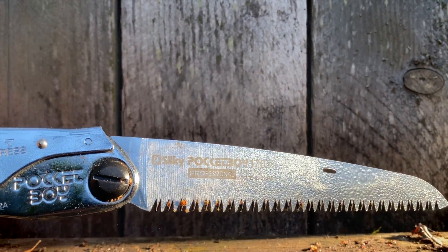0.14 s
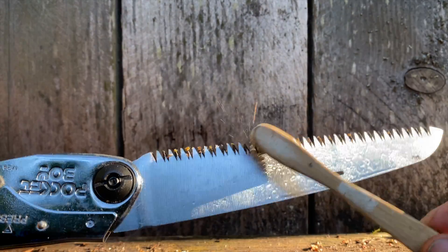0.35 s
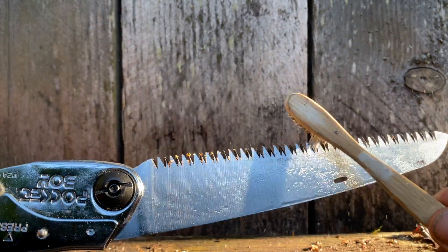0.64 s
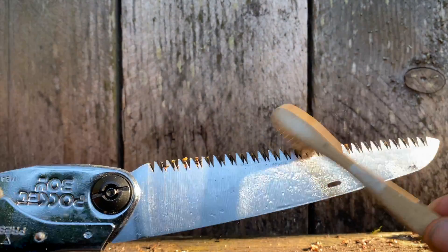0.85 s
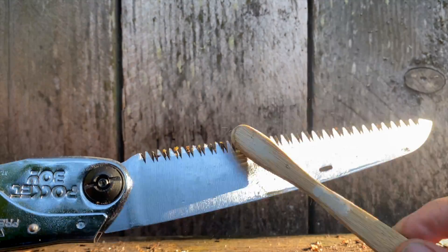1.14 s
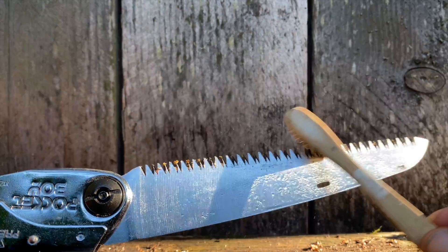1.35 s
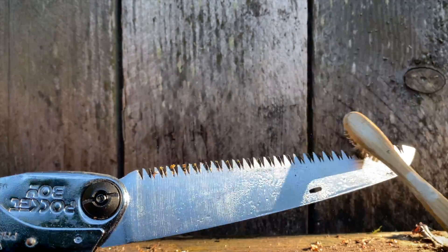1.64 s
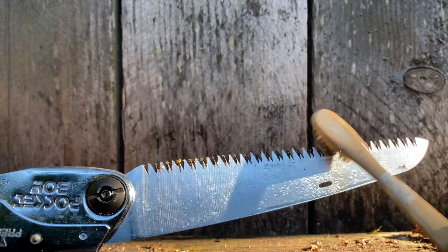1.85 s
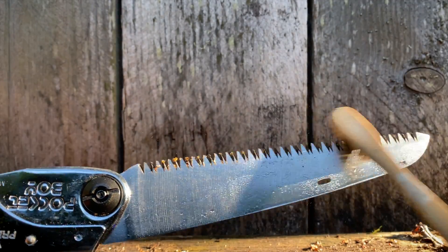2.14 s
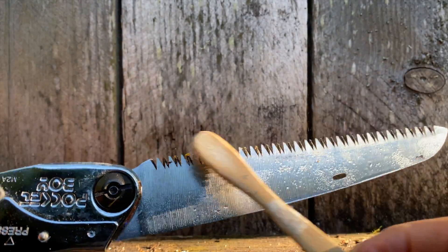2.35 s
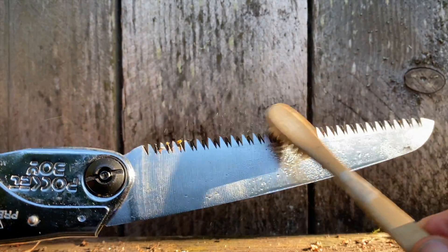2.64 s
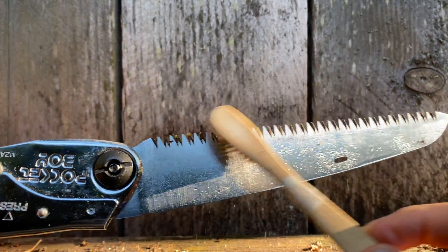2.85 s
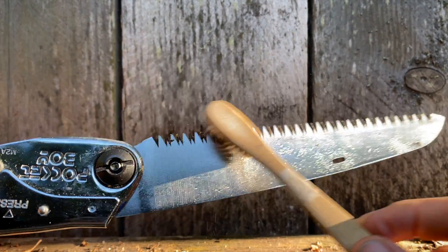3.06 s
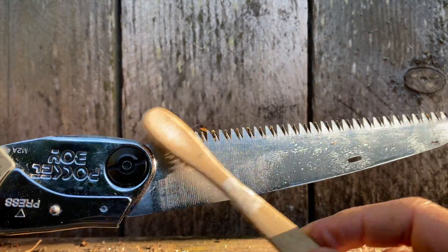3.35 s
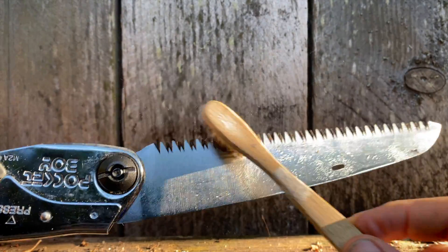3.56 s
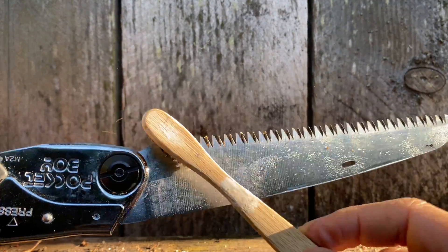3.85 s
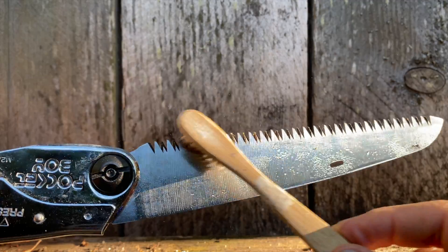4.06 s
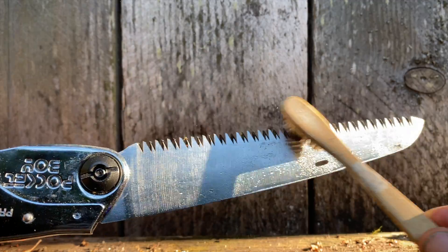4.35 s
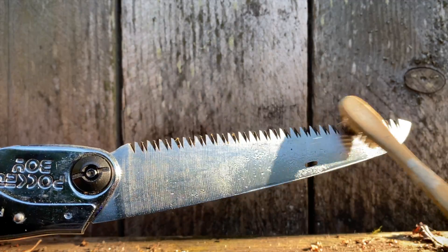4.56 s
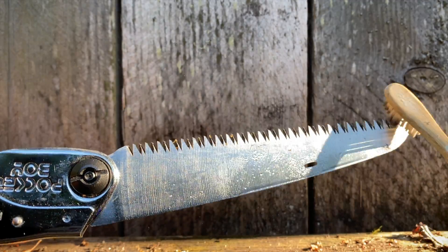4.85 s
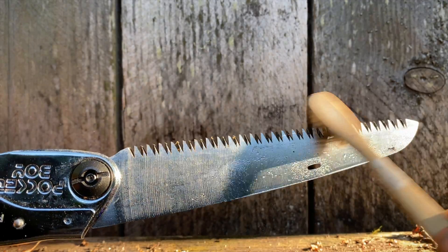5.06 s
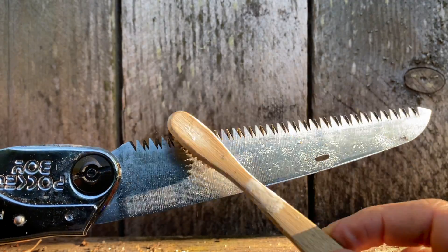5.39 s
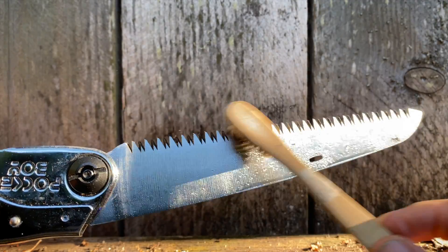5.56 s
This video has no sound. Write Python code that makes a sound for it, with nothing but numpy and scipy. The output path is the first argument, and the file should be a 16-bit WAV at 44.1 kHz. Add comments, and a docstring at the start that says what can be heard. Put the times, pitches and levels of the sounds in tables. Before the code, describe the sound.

Bristles scrape to and fro over a thin saw blade, close to a mono camera microphone. After a quiet opening with thin bird whistles, rapid uneven strokes give hissy, zippy rasps and tinny metallic shimmer, with scattered crisp snaps. Later strokes are mostly longer and steadier, with tiny gaps at the turns and a few quick ones among them. Faint far traffic and a low engine hum stay well behind, outdoors with no obvious echo.

```python
"""A toothbrush scrubs the teeth of a folding saw to and fro, close to a camera outdoors: bristles flick off
the teeth in clumps and ring the thin steel blade. Bursts of noise set off a bank of resonances, one for
each way the blade can ring, and noise shaped in pitch adds the dry rasp. Far traffic (shaped noise) and a
wavering engine drone (resonating noise) hum underneath, and a small bird (sine notes) chirps at the start."""
import sys
import numpy as np
from scipy import signal
from scipy.fft import rfft, irfft, next_fast_len
from scipy.io import wavfile
from scipy.ndimage import uniform_filter1d, map_coordinates

SR = 44100
rng = np.random.default_rng(int(sys.argv[2]) if len(sys.argv) > 2 else 0)


def voltage_ratio(level):
    """Linear amplitude factor for a level in decibels (scalar or array-like)."""
    return 10 ** (np.asarray(level, float) / 20)


def wav_out(sig):
    """Save sig, one row per channel (or a flat mono array), as 16-bit PCM at SR to the path in sys.argv[1]."""
    wavfile.write(sys.argv[1], SR, np.round(np.clip(np.atleast_2d(sig).T, -1, 1) * 32767).astype(np.int16))


N = 252248

# how loud the far noise is before its final trim: (time [s], traffic level [dB], engine drone level [dB])
AIR = [(0, -83, -91), (.5, -73, -81), (1.1, -72, -76), (1.8, -72, -69), (2.33, -70, -63.5),
       (2.8, -70.5, -73.5), (3.8, -71, -75), (4.1, -71, -65.5), (4.4, -70, -80.5), (5.72, -68.5, -75)]
TOP_HZ = 15700  # top of the camera's band


def unit(x):
    """Scaled to rms 1."""
    return x / np.sqrt(np.mean(x ** 2) + 1e-20)


def curves(rows):
    """One value per sample for each column after the time."""
    times, *columns = np.transpose(rows)
    return [np.interp(np.arange(N) / SR, times, column) for column in columns]


def wobble(rate):
    """A smooth random curve, rate knots a second."""
    knots = rng.standard_normal(int(N * rate / SR) + 4)
    return map_coordinates(knots, [np.arange(N) * rate / SR])


def coloured(x, spectrum):
    """x filtered through (pitch [Hz], level [dB]) points joined on a log pitch axis."""
    m = next_fast_len(N + 8192)
    hz, level_db = np.transpose(spectrum)
    gain = voltage_ratio(np.interp(np.log(np.fft.rfftfreq(m, 1 / SR) + 1), np.log(hz + 1), level_db))
    return irfft(rfft(x, m) * gain, m)[:N]


def mode(x, hz, width_hz):
    """A two-pole resonance with gain 1 at its peak; the narrower it is, the longer it rings."""
    r = np.exp(-np.pi * width_hz / SR)
    top = [(1 - r * r) / 2, 0, (r * r - 1) / 2]
    bottom = [1, -2 * r * np.cos(2 * np.pi * hz / SR), r * r]
    return signal.lfilter(top, bottom, x)


def patchy(x, depth_db, size=(4, 7)):
    """Random patches of gain over pitch and time (size in bins, frames)."""
    z = signal.stft(x, nperseg=256)[2]
    field = uniform_filter1d(rng.standard_normal(z.shape), size=size[0], axis=0)
    field = uniform_filter1d(field, size=size[1], axis=1)
    return signal.istft(z * voltage_ratio(depth_db * unit(field)), nperseg=256)[1][:N]


def traffic():
    """Smooth far traffic: noise with most of its strength in the low and middle pitches."""
    # colour of the traffic: (pitch [Hz], relative level [dB])
    traffic_colour = [(25, -50), (70, -15), (270, -11), (500, -8), (1200, -8.5), (1800, -17), (2300, -25.5),
                      (3200, -33), (6000, -75)]
    traffic_db, _ = curves(AIR)
    level = voltage_ratio(traffic_db + 3 + 0.6 * wobble(3.08))
    return level * unit(coloured(rng.standard_normal(N), traffic_colour))


def engine_drone():
    """A wavering engine drone: noise through low resonances, with a level that trembles."""
    _, drone_db = curves(AIR)
    upper = unit(mode(rng.standard_normal(N), 125.0, 11.5))
    lower = unit(mode(mode(rng.standard_normal(N), 85, 57), 79, 62))
    waver = voltage_ratio(3.0 * wobble(19))
    return voltage_ratio(drone_db - 5.5) * waver * (upper + 0.74 * lower)


def bird():
    """Thin quick whistles: sine notes that sag a little in pitch and flutter fast in level."""
    # bird notes: (time [s], level before fade and flutter [dB], starting pitch [Hz], length scale [s])
    chirps = [(0.114, -75.5, 4540, 0.086), (0.166, -59, 4600, 0.038), (0.212, -59, 4640, 0.032),
              (0.249, -60, 8100, 0.02)]
    out = np.zeros(N)
    for start, level_db, hz, length in chirps:
        t = np.arange(round(4 * length * SR)) / SR
        shape = (1 - np.exp(-t / 0.0048)) * np.exp(-2.5 * t / length)
        whistle = np.sin(2 * np.pi * hz * t * (1 - 0.17 * t))
        out[round(start * SR):][:len(t)] += voltage_ratio(level_db) * shape * whistle
    return out * voltage_ratio(8.4 * np.tanh(wobble(308.0)))


def hand():
    """Speed along the teeth: each stroke picks up, sweeps in an arc and slows, with a creep before and after."""
    # the strokes, to and fro: (starts [s], slows [s], stops [s],
    #                           rasp level at the start [dB], rasp level as it slows [dB])
    strokes = [(0.315, 0.415, 0.48, -56.5, -54), (0.478, 0.541, 0.59, -50, -45),
               (0.631, 0.716, 0.78, -72.5, -40.5), (0.829, 0.935, 1.009, -38.5, -38.5),
               (1.052, 1.134, 1.148, -45, -46.5), (1.177, 1.258, 1.321, -38, -36),
               (1.342, 1.395, 1.46, -50, -41), (1.466, 1.567, 1.645, -40, -36.5),
               (1.704, 1.795, 1.823, -50.5, -41.5), (1.851, 1.996, 2.007, -42.5, -43),
               (2.083, 2.363, 2.439, -43.5, -43.5), (2.473, 2.672, 2.744, -44.5, -41),
               (2.748, 2.932, 2.957, -45.5, -43.5), (3.001, 3.105, 3.126, -44.5, -39),
               (3.186, 3.368, 3.436, -39.5, -48.5), (3.441, 3.592, 3.645, -42, -42),
               (3.7, 3.835, 3.848, -42, -45.5), (3.945, 4.08, 4.12, -45.5, -45.5),
               (4.027, 4.565, 4.557, -42, -45), (4.538, 4.627, 4.73, -45.5, -43.5),
               (4.739, 4.852, 4.885, -57.5, -47.5), (4.905, 5.289, 5.44, -46.5, -43),
               (5.431, 5.698, 6.03, -44.5, -39)]
    pickup_s, arc_db = 0.039, 3.5  # the hand gathers speed; mid-stroke is louder than the ends
    # bristles creep softly while they lean in before a stroke and settle after it
    creep_db, lean_s, settle_s = -17, 0.063, 0.018
    t, speed = np.arange(N) / SR, np.zeros(N)
    for starts, slows, stops, start_db, end_db in strokes:
        u = np.clip((t - starts) / (slows - starts), 0, 1)  # how far through the stroke
        level_db = start_db + (end_db - start_db) * u + arc_db * 4 * u * (1 - u)
        pickup = (t - starts) / pickup_s
        slowing = (stops - t) / max(stops - slows, 0.01)
        edge = np.clip(np.minimum(pickup, slowing), 0, 1)
        outside = np.minimum((t - starts) / lean_s, (stops - t) / settle_s)
        creep = np.exp(np.minimum(0, outside))
        stroke = voltage_ratio(level_db / 2) * np.maximum(edge, voltage_ratio(creep_db / 2) * creep)
        speed = np.maximum(speed, stroke)
    return speed  # loudness grows with its square


def flicks(rate, spread_db, clump_db, tick_db):
    """Sizes of single bristles letting go; they come in clumps as tufts cross the teeth."""
    hit = rng.random(N) < rate / SR  # rate is flicks per second
    size = voltage_ratio(spread_db * np.minimum(rng.exponential(size=N), 4))
    clumps = voltage_ratio(clump_db * np.tanh(wobble(60)) + tick_db * np.tanh(wobble(260)))
    return unit(hit * size * clumps)


def snapping_tufts():
    """Tufts that snap off a tooth together: quick rise, then a fade; returns strength and crispness."""
    # (time [s], level before rise and fade [dB], crispness [0-1], time to fall by 60 dB [s])
    snaps = [(0.395, -41, 0.4, 0.021), (0.425, -35.5, 0.8, 0.073), (0.447, -26, 0.7, 0.023),
             (0.472, -31.5, 1, 0.053), (0.536, -35, 0.73, 0.036), (0.57, -36, 0.97, 0.057),
             (0.616, -53, 0.4, 0.027), (0.6743, -54, 1, 0.051), (0.716, -35, 0.7, 0.034),
             (0.871, -27.5, .5, 0.083), (1.2065, -34, .5, 0.03), (1.488, -28, .5, 0.033),
             (1.599, -35, 1, 0.028), (1.636, -31.5, 0.6, 0.014), (1.659, -32.5, 0.18, 0.038),
             (2.006, -39, 0.9, 0.038), (2.452, -46, 0.5, 0.17), (2.744, -47, 1, 0.04),
             (3.229, -45, .5, 0.048), (3.693, -43.5, 1, 0.04), (3.83, -39, 0.6, 0.038),
             (3.973, -46, .4, 0.068), (4.347, -38, .5, 0.023), (4.4404, -42, 0.52, 0.018),
             (4.664, -30.5, .7, 0.043), (4.782, -28.5, .5, 0.031), (4.811, -38, 0.7, 0.017),
             (5.363, -39.5, 0.5, 0.034), (5.48, -34, .7, 0.041)]
    snap, crisp = np.zeros((2, N + SR))
    t = np.arange(SR // 10) / SR
    for start, level_db, crispness, dies in snaps:
        here = slice(round(start * SR), round(start * SR) + len(t))
        snap[here] += voltage_ratio(level_db - 60 * t / dies) * (1 - np.exp(-t / (0.079 * dies)))
        crisp[here] += crispness * voltage_ratio(-10 * t / dies)
    return snap[:N], crisp[:N]


def shoves():
    """The brush head bears down and shakes the blade's lowest modes: smooth bumps of strength."""
    # (middle [s], time from the middle to 1/e of the peak [s], peak drive level [dB])
    bumps = [(1.239, 0.028, -29.5), (1.547, 0.024, -29)]
    t = np.arange(N) / SR
    return sum(voltage_ratio(peak_db) * np.exp(-((t - middle) / half) ** 2) for middle, half, peak_db in bumps)


def bristle_rasp(teeth, brisk):
    """Bristles rubbing, without the ring: coloured noise, patchy as bristles have every length and bend."""
    # colour of the rubbing: (pitch [Hz], relative level [dB])
    rasp_colour = [(880, -72), (1500, -40), (3520, -11), (4290, -9.5), (4870, -7), (16000, -7)]
    rubbing = teeth * brisk ** 6.8 * rng.standard_normal(N)
    return voltage_ratio(-9.5) * patchy(coloured(rubbing, rasp_colour), depth_db=8.0)


def ringing_blade(teeth, brisk):
    """Noise bursts drive every blade mode, each at a strength that drifts as the brush moves along."""
    # modes of the steel: (pitch before detuning [Hz], width before narrowing [Hz], relative level [dB])
    blade_modes = [(996, 53, -28), (1440, 39, -19), (1990, 50, -11), (2810, 70, -24), (3170, 40, -20),
                   (4160, 33, -3), (4370, 45, -1.5), (5330, 60, -5), (5840, 50, -15), (6310, 76, -9),
                   (6810, 36, -9), (7200, 56, -3), (7840, 40, -11), (8190, 81, -12), (8510, 67, -15),
                   (8950, 38, -12), (9190, 79, -12), (10200, 96, -8), (10600, 32, -14), (11360, 55, -3),
                   (12310, 70, -4), (13400, 74, -8), (13900, 70, -9), (15100, 100, -5), (15400, 43, -9),
                   (345, 70, -27), (2200, 60, -22), (4490, 70, -9), (10080, 50, -9), (11210, 60, -9),
                   (12550, 90, -6)]
    # crowds of close tooth modes: (pitch before detuning [Hz], width before narrowing [Hz],
    #                               relative level [dB])
    crowds = [(3100, 1040, -30.5), (4050, 354, -15), (13230, 300, -10), (14850, 790, -11.5)]
    # levels of three groups of modes over the rest of the blade:
    # (time [s], low modes level [dB], 4 kHz pair level [dB], 5 kHz mode level [dB])
    group_levels = [(0.38, -8, 6, 7.5), (0.56, -9.5, -11.5, -0.5), (0.9, -7.5, -9.5, -4), (1.1, -7, 0, 9.5),
                    (1.24, 4.5, 3, 4), (1.4, -6, -13.5, 5), (1.54, 3.5, 0, -2.5), (1.78, -9, -2.5, -3),
                    (2.16, -1, -4.5, 3.5), (2.33, 2, 7, 6), (2.64, -4.5, 3, 4.5), (3.08, -5.5, 6.5, 1),
                    (3.27, -8, 5, -0.5), (4.05, -6.5, 4.5, 1.5), (4.2, -1, 5, 6), (4.46, -6, -7.5, 6),
                    (4.6, -0.5, -0.5, -4), (4.85, -10, 3.5, -2), (5.13, -2, -9, 8), (5.32, -12, 10, 2),
                    (5.68, 0.5, -2, 4)]
    detune = 0.003  # share by which the pressing bristles pull each mode up or down
    bend_db, pair_db, fifth_db = curves(group_levels)
    shove = shoves()
    load = np.pi / 4 * (1 + np.tanh(wobble(7)))  # the bristles press on the steel, now more, now less
    out = np.zeros(N)
    for hz, width_hz, level_db in [*blade_modes, *crowds]:
        drive = teeth
        if hz < 2500:
            drive = voltage_ratio(bend_db) * teeth
        if hz < 1600:
            drive = voltage_ratio(-2) * drive + shove
        if 3800 < hz < 4800:
            drive = voltage_ratio(pair_db) * teeth
        if 4800 < hz < 5600:
            drive = voltage_ratio(fifth_db) * teeth
        drive = drive * brisk ** (1.64 * hz / TOP_HZ)
        # low modes have wide bellies; a crowd of modes averages out
        sharp = np.sqrt(min(1, hz / 6000)) / (1 + width_hz / 600)
        # the brush is nearer a node (still spot) or a belly (lively spot) of this mode
        drift_db = sharp * (8.9 * np.tanh(wobble(10)) + 4.03 * np.tanh(wobble(45)))
        push = drive * voltage_ratio(level_db + 14.0 + drift_db) * rng.standard_normal(N)
        for side, share in ((1 - detune, np.cos(load)), (1 + detune, np.sin(load))):
            out += mode(push * share, hz * side, 0.75 * width_hz)
    return out


def brush():
    """Flicks follow the square of the hand's speed; with the snaps they make the rasp and ring the blade."""
    speed = hand()
    snap, crisp = snapping_tufts()
    teeth = speed ** 2 * flicks(rate=1900, spread_db=1.5, clump_db=2.0, tick_db=1.0) + snap
    # slow bristles bend softly and lose their treble
    brisk = np.minimum(np.maximum(speed / voltage_ratio(-20.0), crisp), 1)
    out = bristle_rasp(teeth, brisk) + ringing_blade(teeth, brisk)
    return patchy(out, depth_db=1.59, size=(12, 40))  # the colour drifts as the brush tilts and travels


def scene():
    """Brush on saw, bird and far noise, in one channel."""
    return (brush() + bird() + traffic() + engine_drone())[None]


def band_limit(x):
    """A steep low-pass at the top of the band."""
    return signal.sosfilt(signal.butter(12, 16480, fs=SR, output="sos"), x)


def record(dry):
    """The camera's band limit: a steep low-pass filter takes off the highest treble."""
    limit = signal.ellip(10, 0.1, 70, TOP_HZ, fs=SR, output="sos")
    mix = signal.sosfilt(limit, dry)
    return band_limit(mix)


dry = scene()
out = record(dry)
wav_out(out)
```